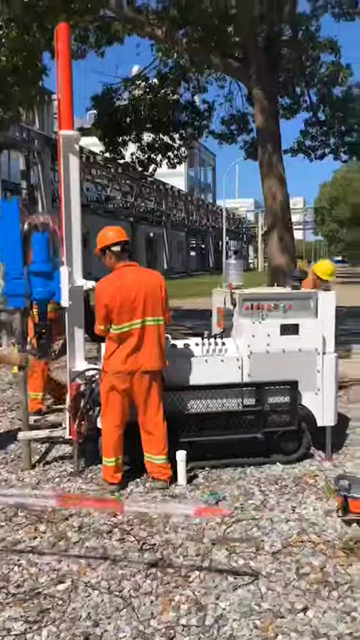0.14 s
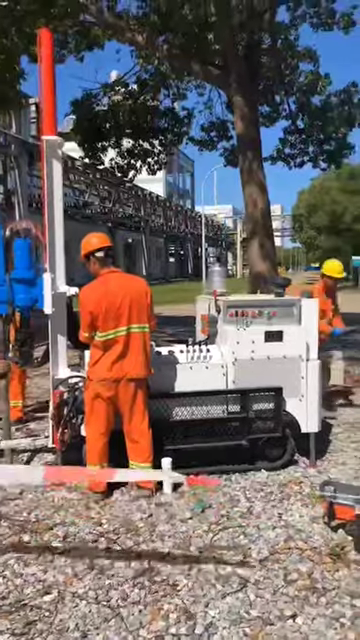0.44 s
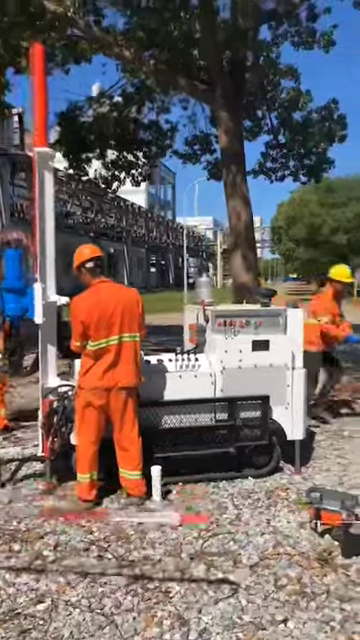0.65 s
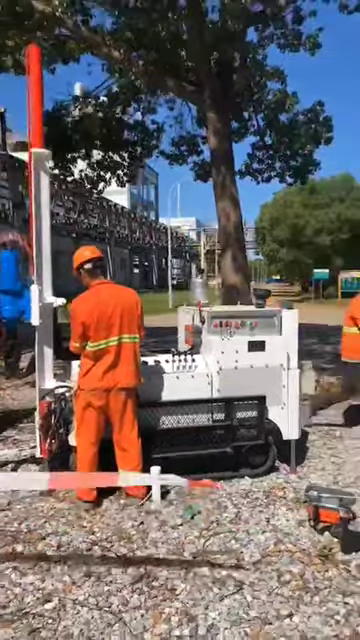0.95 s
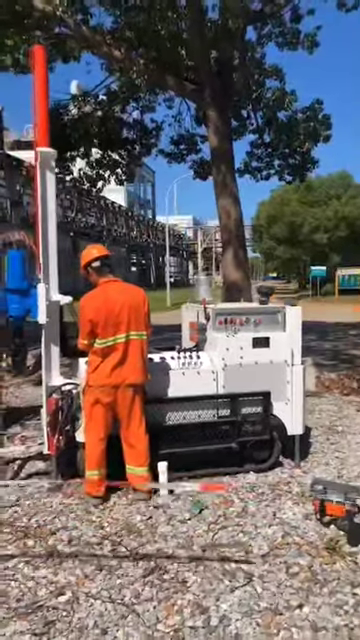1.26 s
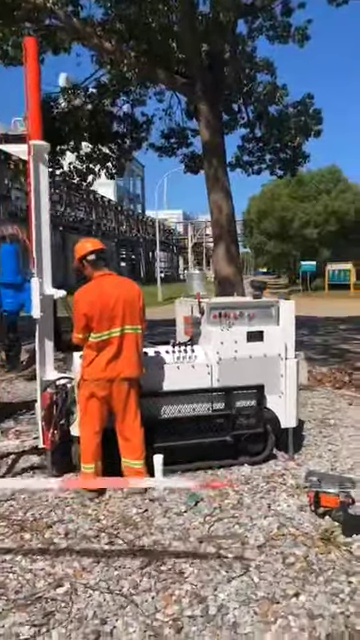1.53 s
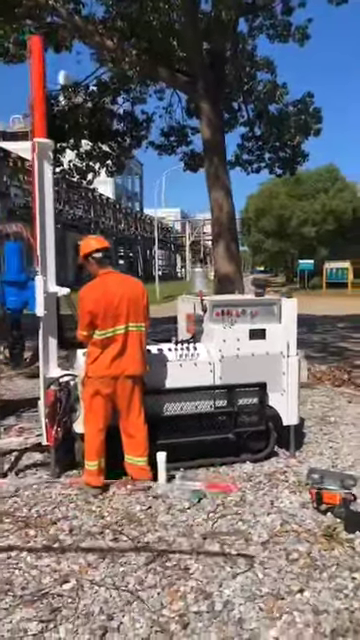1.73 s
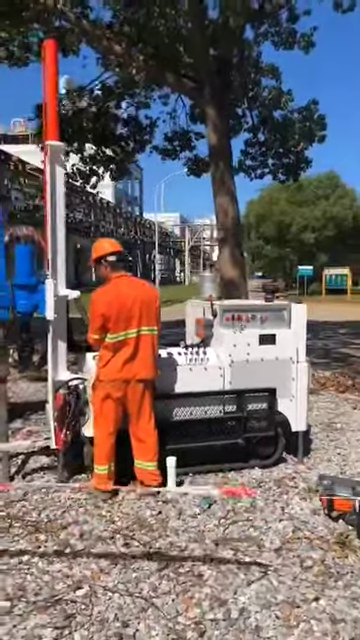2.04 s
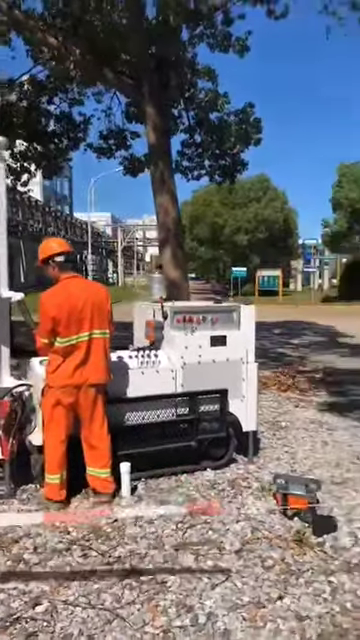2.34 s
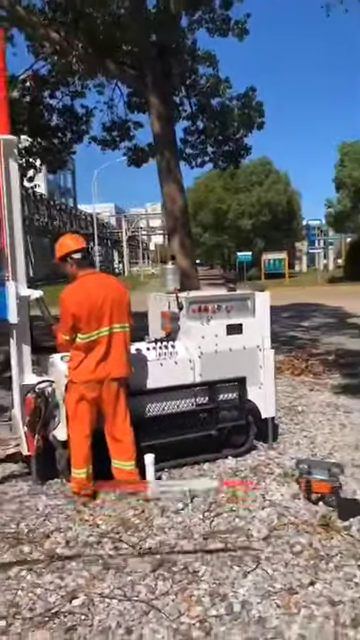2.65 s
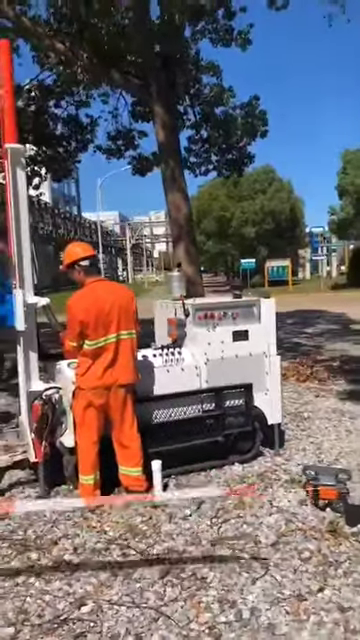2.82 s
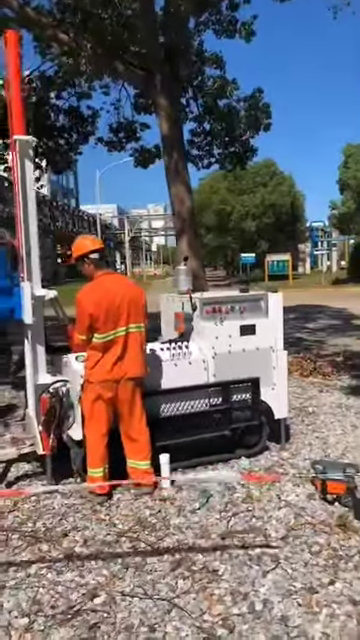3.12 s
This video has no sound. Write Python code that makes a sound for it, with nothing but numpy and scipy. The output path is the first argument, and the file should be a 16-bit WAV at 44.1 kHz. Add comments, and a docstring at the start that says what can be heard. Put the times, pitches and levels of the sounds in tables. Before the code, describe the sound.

Rapid-fire metallic hammering from a small drilling rig, clanking and jangling above a low diesel chug.

```python
"""The hydraulic hammer of a small drilling rig drives a steel rod into gravel, 17 blows a second, outdoors.
Filtered noise bursts and knocks make the blows; sines ring the rod and mast, then the return valve clicks.
A diesel chugs underneath: low sine orders and puffing noise. Sparse echoes of the hammer come off the yard.
One microphone takes it in mono, and the recorder's limiter ducks at the blows."""
import sys
import numpy as np
from scipy import signal
from scipy.fft import rfft, irfft
from scipy.io import wavfile
from scipy.ndimage import uniform_filter1d, minimum_filter1d

SR = 44100
rng = np.random.default_rng(int(sys.argv[2]) if len(sys.argv) > 2 else 0)


def store_pcm(level_fs):
    """Save levels as 16-bit WAV."""
    pcm = np.round(np.clip(level_fs, -1, 1) * 32767).astype(np.int16)
    wavfile.write(sys.argv[1], SR, np.atleast_2d(pcm).T)


N = 144648
T = np.arange(N) / SR  # s


def amp(db):
    """Amplitude of a level in dB."""
    return 10 ** (np.asarray(db) / 20)


def evened(x):
    """The same signal at unit power."""
    return x / np.sqrt(np.mean(x ** 2) + 1e-20)


def add(mix, s, sound):
    """Lay a sound into the mix at s seconds."""
    part = mix[max(round(s * SR), 0):][:len(sound)]
    part += sound[:len(part)]


def colour(x, points, peaks=(), size=8192):
    """Causal (minimum-phase) filter of unit power: a smooth spectrum plus resonances."""
    hz = np.fft.rfftfreq(size, 1 / SR)
    f, db = np.transpose(points)
    power = amp(np.interp(np.log(hz + 1), np.log(f), db)) ** 2
    for peak_hz, width, peak_db in peaks:
        power = power + amp(peak_db) ** 2 / (1 + ((hz - peak_hz) / width) ** 2) ** 2
    # folding the cepstrum puts the energy as early as possible
    cepstrum = irfft(np.log(evened(np.sqrt(power))))
    cepstrum[1:size // 2] *= 2
    cepstrum[size // 2 + 1:] = 0
    response = irfft(np.exp(rfft(cepstrum)))[:size // 2]
    return signal.fftconvolve(x, response)[:N]


def drift(hz):
    """Random wander of unit size, slower than about hz."""
    lowpass = np.exp(-(np.fft.rfftfreq(N, 1 / SR) / hz) ** 2)
    return evened(irfft(rfft(rng.standard_normal(N)) * lowpass, N))


def fade(t60, rise_s=1e-5):
    """Quick rise and exponential fall (60 dB in t60 seconds), cut at a quarter second."""
    t = T[:SR // 4]
    return np.minimum(t / rise_s, 1) * np.exp(-np.log(1000) * t / t60)


def bursts(times, levels_db, envelope, repeat=0):
    """A burst of tiny contacts (noise) at each time; a share of its power is alike every time."""
    out, same = np.zeros(N), rng.standard_normal(len(envelope))
    repeat = np.clip(repeat, 0, 1)
    for s, db in zip(times, levels_db):
        fresh = rng.standard_normal(len(envelope))
        noise = np.sqrt(repeat) * same + np.sqrt(1 - repeat) * fresh
        add(out, s, amp(db) * envelope * noise)
    return out


def clicks(times, levels_db):
    """One sharp knock, a single sample, at each time."""
    out = np.zeros(N)
    for s, db in zip(times, levels_db):
        add(out, s, amp([db]))
    return out


# Every blow at the rod: t/s, then level/dB of strike, rod ring, mast knock, valve click, hose thump
HAMMER_BLOWS = [(0.148, -11, -4, -4.5, -2, -6), (0.2053, -1.5, -5, 1, -2, 1),
                (0.262, -6.0, -5.5, -1, -1, 1), (0.3189, -5, 1, -3, -3, -2),
                (0.3774, -11.0, 1.5, 0.5, -8, -10.0), (0.4344, -12, -2, -4, 0, 0),
                (0.493, -14.5, -5, -7.5, 2, -4), (0.5505, -11, -19, -5.5, -4, 2),
                (0.6082, -8.5, 4, -4.5, -3, -13), (0.6663, -11, -12, -5, -3.0, -11),
                (0.7235, -6, -12, -2, -10, -5), (0.7828, -6, -11.0, -2.5, -5, -3),
                (0.8393, -4, -3, -4, -9, -1), (0.897, -5.0, -15, -2, 0, -10.0),
                (0.9549, -7.5, -2.0, -2.5, -2, -8), (1.0132, -6.5, 3, 0.5, 3, -3),
                (1.0689, -6.0, 2, 0.0, -16, 0.5), (1.1288, -3, 3, 0.5, -2, 0),
                (1.1861, -6, 0, -0.5, -1, -1), (1.2438, -6.5, 2, -2, -8, 2.5),
                (1.3024, -5.5, -9.0, -0.5, -8, -5), (1.3594, -3, -2, 0, 2, 0),
                (1.4174, -3.5, 8, -1.5, -0.5, -13), (1.4758, -3.5, 0, 2.5, -7, -4),
                (1.5348, 1, -1.0, 3, -3.5, 5), (1.5915, -3, 3, 1, 1, -0.5), (1.6486, -5, -7, -3.5, 3, 1),
                (1.7068, -2.0, -6.0, -1.5, 0, 3), (1.7653, -3, 1, 0.5, -4, 6),
                (1.8231, -1.5, 0.0, -2.5, 3, 8), (1.8812, -1.0, 8, 0.5, 0.5, 2),
                (1.9385, 0, 14.5, -1.5, 0, 0), (1.9965, -10, 13, -4.5, 6, 4), (2.0547, -1, -6, -2, 7, 1),
                (2.1123, 1.0, -6, -1.5, 3.5, 6), (2.1706, -2.5, -9, 1, 10, -10.0),
                (2.229, 1, -2, -0.5, -13, -5), (2.2861, -1, -4, -4.5, -4, 5), (2.3431, 0, -2.0, 5.5, 1, 2),
                (2.4022, 0.5, 7, 4, 5, 4), (2.46, -1, 7, 1, 8, 5.5), (2.5169, -3.5, 14.5, 1, 5, 0),
                (2.5762, -8.5, 11, -4.5, 3, 0.5), (2.6337, 1, 21.5, 0.5, 5, 7), (2.6911, 0, -7, 0.5, 2, 7),
                (2.7492, 3, -10, -0.5, 13, 3.5), (2.8071, -2, -10, -1, 3, 6),
                (2.8646, -1.5, 13, 1.5, 1, -1), (2.9219, -1.5, 7.0, 1, 0, -12),
                (2.9805, -3.5, -5, 1.5, 0, 0.5), (3.0386, 2.5, -9.5, -1, -9.5, 3.5),
                (3.0965, -2.5, -4, 3, 4, -1), (3.1544, -3, 7, -2.5, -1, -11), (3.2123, 1, -4, -1, 11, 5),
                (3.2696, -3, -5, -11.5, -12, -10.0)]
# Hammer force as the rod bites, heard in the loose fittings and the oil: t/s, level/dB
BITE_FORCE = [(.15, -12), (.7, -4), (1.2, 1.5), (2, 5), (2.6, 2.5), (3.28, 2.5)]


def hammer():
    """Each stroke strikes and rings the rod, shakes mast, fittings and hoses, and works the valve."""
    times, strike_db, ring_db, mast_db, valve_db, thump_db = np.transpose(HAMMER_BLOWS)
    force_db = np.interp(times, *np.transpose(BITE_FORCE))
    rod = strikes(times, strike_db) + singing(times, ring_db)
    rig = anvil(times, strike_db) + mast(times, mast_db) + fittings(times, force_db, mast_db)
    hydraulics = surge(times, thump_db) + valve(times, valve_db) + oil(times, force_db)
    return rod + rig + hydraulics


STRIKE_DB, PUNCH_DB = -0.5, 4  # whole strike; sharp knock within each contact
# first rebound against the blow, and the loss at each later one (dB); mean spacing (s)
REBOUND_S, REBOUND_DB, REBOUND_LOSS_DB = .00115, 3, 4
CHATTER_DB, CHATTER_SPREAD_DB, CHATTER_T60_S = -4.5, 3, 0.036
# the rod scrapes in its guide just before the piston lands
SCRAPE_LEAD_S, SCRAPE_DB, SCRAPE_T60_S = 0.0027, -16, 0.017
# each blow meets the rod a little differently: treble tilt (dB), resonance level (dB), pitch (share)
BRIGHT_SPREAD_DB, PEAK_SPREAD_DB, PEAK_SPREAD_SHARE = 0.5, 1.5, .005
# Colour of the struck rod: f/Hz, level/dB
ROD_COLOUR = [(100, -16), (700, -17.5), (1300, -2.5), (2000, -6.5), (2600, -14), (3300, 0.5), (4700, -5.5),
              (7000, -6), (9300, 1.5), (12200, -4.5), (13500, -9.5), (15500, -63)]
# Resonances of the struck rod: f/Hz, width/Hz, level/dB
ROD_RESONANCES = [(3243, 425, 1.24), (4478, 68, 2.9), (5270, 210, 6.7), (5960, 194, 6.4), (6724, 96, 4.3),
                  (7500, 75, 5.2), (8134, 160, 11.6), (9490, 210, 2.9)]


def strikes(times, levels_db, count=4):
    """A scrape, the piston's hit, three rebounds and a chattering joint excite the rod's resonances."""
    contact, drive, out = fade(t60=0.0026, rise_s=0.00014), np.zeros(N), np.zeros(N)
    spacing = REBOUND_S * rng.uniform(0.8, 1.25, len(times))
    for k in range(count):
        at = times + k * spacing
        rebound_db = REBOUND_DB - (k - 1) * REBOUND_LOSS_DB if k else 0
        sizes_db = levels_db + rebound_db
        drive += bursts(at, sizes_db, contact, repeat=0.25)
        drive += clicks(at + .0003, sizes_db + PUNCH_DB)
    chatter_db = levels_db + CHATTER_DB + CHATTER_SPREAD_DB * rng.standard_normal(len(times))
    drive += bursts(times, chatter_db, fade(CHATTER_T60_S, rise_s=0.0012), repeat=0.05)
    scrape_times = times - SCRAPE_LEAD_S
    drive += bursts(scrape_times, levels_db + SCRAPE_DB, fade(SCRAPE_T60_S, rise_s=0.0006))
    # cut the drive into blows and give each its own colour
    starts = np.round(scrape_times * SR).astype(int)
    for start, blow in zip(starts, np.split(drive, starts)[1:]):
        tilt_db = BRIGHT_SPREAD_DB * (2 * rng.random() - 1)
        body = [(hz, db + tilt_db * np.tanh(np.log2(hz / 6500))) for hz, db in ROD_COLOUR]
        peaks = []
        for hz, width, db in ROD_RESONANCES:
            peak_hz = hz * (1 + PEAK_SPREAD_SHARE * rng.standard_normal())
            peaks.append((peak_hz, width, db + PEAK_SPREAD_DB * rng.standard_normal()))
        add(out, start / SR, colour(blow, body, peaks, size=2048))
    return amp(STRIKE_DB) * out


RING_PEAK_S, RING_WIDTH_S, CLAMP_S = 0.016, 0.021, 0.0016  # swell after the blow; clamping time
RING_SPREAD_HZ = 10.4


def ring(times, levels_db, hz):
    """The rod sings on a high mode: the note swells and dies, and the next blow clamps it."""
    out, t = np.zeros(N), T[:SR // 4]
    swell = np.exp(-((t - RING_PEAK_S) / RING_WIDTH_S) ** 2)
    for s, db, gap in zip(times, levels_db, np.diff(times, append=T[-1] + 1)):
        free = np.exp(-np.maximum(t - gap, 0) / CLAMP_S)
        pitch = hz + RING_SPREAD_HZ * rng.standard_normal()
        tone = np.sin(2 * np.pi * (pitch * t + rng.random()))
        add(out, s, amp(db) * free * swell * tone)
    return out


RING_HZ, RING_DB = 8172, -29
OVERTONE_HZ, OVERTONE_DB, OVERTONE_SPREAD_DB = 12145, -33.5, 3


def singing(times, ring_db):
    """Two high modes of the rod; the upper one varies in level by chance."""
    overtone_db = OVERTONE_DB + OVERTONE_SPREAD_DB * rng.standard_normal(len(times))
    return ring(times, RING_DB + ring_db, RING_HZ) + ring(times, overtone_db, OVERTONE_HZ)


ANVIL_DB, ANVIL_DELAY_S, ANVIL_T60_S = -21, 0.001974, 0.025
# Colour of the anvil block: f/Hz, level/dB
ANVIL_COLOUR = [(300, -12), (1350, -1), (1900, 3), (2600, -1), (4000, -27.5)]


def anvil(times, strike_db):
    """The anvil block clanks just after the piston lands, partly alike at every blow."""
    envelope = fade(ANVIL_T60_S, rise_s=0.00027)
    clank = bursts(times + ANVIL_DELAY_S, ANVIL_DB + strike_db, envelope, repeat=0.52)
    return colour(clank, ANVIL_COLOUR)


MAST_DB, MAST_DELAY_S, MAST_RISE_S, MAST_T60_S = -28.5, .0132, 0.0014, 0.1  # rattle; delay of both
MODES_DB, MODES_HOLD_S, MODES_T60_S = -31.5, 0.018, 0.094
MODES_SPREAD_DB, MODES_SPREAD_SHARE = 1.86, 0.0046  # chance in each mode's level and pitch
# Colour of the rattle in the mast and hammer housing: f/Hz, level/dB
MAST_RATTLE = [(100, -35.5), (300, -9), (600, -6), (850, -19), (1500, -8), (2400, -15.5), (5000, -62)]
# Ringing modes of the mast: f/Hz, level/dB
MAST_RINGS = [(364, -9.5), (628, -1.5), (757, -4.5), (972, -5.5), (1087, -13.5), (1295, -8.5)]


def mast(times, levels_db):
    """The recoil knocks the mast, which rings much the same way each time and rattles a little."""
    t, ringing, knocks = T[:SR // 4], np.zeros(N), times + MAST_DELAY_S
    decay = np.exp(-np.log(1000) * np.maximum(t - MODES_HOLD_S, 0) / MODES_T60_S)
    envelope = np.minimum(t / 0.00078, 1) * decay
    for s, level_db in zip(knocks, levels_db):
        for hz, db in MAST_RINGS:
            strength, detune = rng.standard_normal(2)
            tone = np.sin(2 * np.pi * hz * (1 + MODES_SPREAD_SHARE * detune) * t)
            mode_db = level_db + MODES_DB + db + MODES_SPREAD_DB * strength
            add(ringing, s, amp(mode_db) * envelope * tone)
    rattle = bursts(knocks, MAST_DB + levels_db, fade(MAST_T60_S, MAST_RISE_S), repeat=0.36)
    return ringing + colour(rattle, MAST_RATTLE)


JANGLE_DB, JANGLE_T60_S, JANGLE_GRAIN_DB = -21, 0.13, 4.5
JANGLE_FOLLOW = 0.47  # share of the mast's knock (in dB) that the loose fittings follow
# Colour of the loose fittings: f/Hz, level/dB
FITTINGS_COLOUR = [(300, 4.5), (1400, 7.5), (2000, 7), (2600, -2), (3200, 10.5), (4600, -1), (7000, 3),
                   (7700, 10), (8900, -3.5), (12300, 6), (13000, -4), (15000, -29)]


def fittings(times, force_db, mast_db):
    """Loose fittings jangle after each blow: noise with a grainy, fluttering level."""
    grain = evened(amp(JANGLE_GRAIN_DB * drift(hz=400)))
    levels_db = JANGLE_DB + force_db + JANGLE_FOLLOW * mast_db
    jangle = bursts(times, levels_db, fade(JANGLE_T60_S, rise_s=0.0062))
    return colour(grain * jangle, FITTINGS_COLOUR)


SURGE_DB, SURGE_DELAY_S, SURGE_RISE_S, SURGE_T60_S = -32, 0.01694, 0.0084, 0.11
KICK_DB, KICK_DELAY_S = -10.5, .0195
# Colour of the pressure surge in the hoses: f/Hz, level/dB
HOSE_SURGE = [(20, -23), (45, 0), (85, 9.5), (170, 5), (300, 0.5), (600, -11.5), (3000, -74)]


def surge(times, thump_db):
    """A pressure surge thumps the hoses: a low shudder of noise and one inverted kick."""
    envelope = fade(SURGE_T60_S, SURGE_RISE_S)
    shudder = bursts(times + SURGE_DELAY_S, SURGE_DB + thump_db, envelope, repeat=0.5)
    kick = clicks(times + KICK_DELAY_S, KICK_DB + thump_db)
    return colour(shudder - kick, HOSE_SURGE)


VALVE_DB, VALVE_DELAY_S, VALVE_T60_S = -16.5, .0417, 0.017
# Colour of the return valve: f/Hz, level/dB
VALVE_COLOUR = [(2000, -7), (4500, -39), (7000, -5), (8200, -4.5), (10000, -7), (12500, -10.5),
                (15500, -26)]
# Ringing of the valve's body: f/Hz, width/Hz, level/dB
VALVE_RESONANCES = [(7510, 53, 9)]


def valve(times, valve_db):
    """The return valve clicks after the blow: a short noise burst that rings its body."""
    click = bursts(times + VALVE_DELAY_S, VALVE_DB + valve_db, fade(VALVE_T60_S, rise_s=0.00075))
    return colour(click, VALVE_COLOUR, VALVE_RESONANCES)


OIL_DB, OIL_S = -29.5, 0.016  # level and length of the hiss
# Colour of the oil's hiss: f/Hz, level/dB
OIL_COLOUR = [(1000, -23), (2600, -7), (3300, 5), (5500, 3.5), (12000, 6.5), (15000, -34)]


def oil(times, force_db):
    """Oil hisses through the open valve and drives the piston down: a brief noise from the click on."""
    envelope = signal.windows.tukey(int(OIL_S * SR))
    return colour(bursts(times + VALVE_DELAY_S, OIL_DB + force_db, envelope), OIL_COLOUR)


CYCLE_HZ = 13.35  # mean working cycles a second
ROAR_DB, PUFF_DEPTH = -30, 0.67
# Low orders of the diesel: multiple of the working cycle, level/dB
ENGINE_ORDERS = [(5, -38.5), (6, -45.5), (8, -42), (10, -48), (11, -51)]
# Colour of the exhaust, fan and pump roar: f/Hz, level/dB per Hz
ENGINE_ROAR = [(15, -28), (35, 7), (90, 2), (160, 2), (280, -4.5), (600, -3.5), (1400, -8), (2600, -11),
               (6000, -8.5), (12000, -5.5), (15500, -28)]


def engine():
    """Sine orders follow the diesel's drifting speed; its roar puffs with its three cylinders."""
    turns = np.cumsum(CYCLE_HZ * (1 + 0.0086 * drift(hz=1.34))) / SR
    hum = np.zeros(N)
    for order, db in ENGINE_ORDERS:
        phase = 2 * np.pi * (round(order) * turns + rng.random())
        hum += np.sqrt(2) * amp(db) * np.sin(phase)
    puffs = 1 + PUFF_DEPTH * np.cos(2 * np.pi * 3 * turns)
    return hum + amp(ROAR_DB) * colour(puffs * rng.standard_normal(N), ENGINE_ROAR)


YARD_DB, YARD_T60_S = -13.5, 0.047


def yard(x):
    """Thin scatter from ground, trees and plant buildings: random echoes by paths over 4 m longer."""
    t = T[:SR // 2]
    echoes = rng.standard_normal(len(t)) * (rng.random(len(t)) < 2000 / SR)  # about 2000 a second
    taps = echoes * (t > .012) * np.exp(-np.log(1000) * t / YARD_T60_S)
    return amp(YARD_DB) * signal.fftconvolve(x, taps / np.linalg.norm(taps))[:N]


def scene():
    """Hammer and its echoes over the engine, at one microphone."""
    blows = hammer()
    return (blows + yard(blows) + engine())[None]


START_S, EDGE_HZ = .1485, 16300  # the sound cuts in; upper band edge
LIMIT_DB, LIMIT_RATIO, HOLD_S, RECOVER_DB_PER_S = -17, 2, .009, 683  # recovery is before the ratio
CEILING = 0.64  # full-scale amplitude towards which peaks are rounded


def record(dry):
    """The sound cuts in; a fast limiter ducks loud moments and rounds peaks; then the band limit."""
    x = dry[0] * (T > START_S)
    power_db = 10 * np.log10(abs(uniform_filter1d(x ** 2, size=66)) + 1e-12)
    over_db = np.maximum(power_db - LIMIT_DB, 0)
    hold = 2 * int(HOLD_S * SR / 2) + 1
    held_db = -minimum_filter1d(-over_db, hold, origin=hold // 2)
    # after the hold, the reduction falls back at a steady rate
    fall = T * RECOVER_DB_PER_S
    recovering_db = np.maximum.accumulate(held_db + fall) - fall
    duck_db = uniform_filter1d(recovering_db, size=44) * (1 - 1 / LIMIT_RATIO)
    rounded = CEILING * np.tanh(x / amp(duck_db) / CEILING)
    lowpass = signal.firwin(511, EDGE_HZ, window=("kaiser", 9), fs=SR)
    return signal.oaconvolve(rounded, lowpass, "same")[None]


dry = scene()
out = record(dry)
store_pcm(out)
```